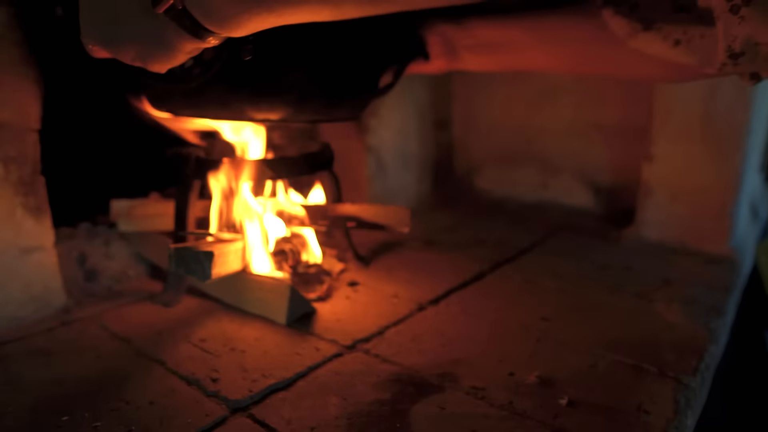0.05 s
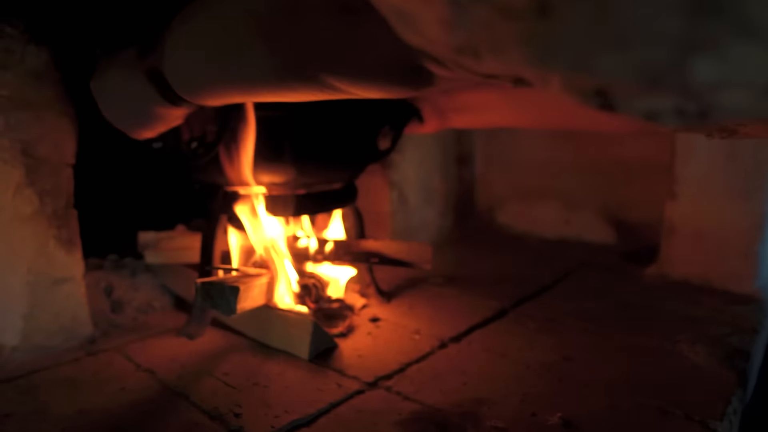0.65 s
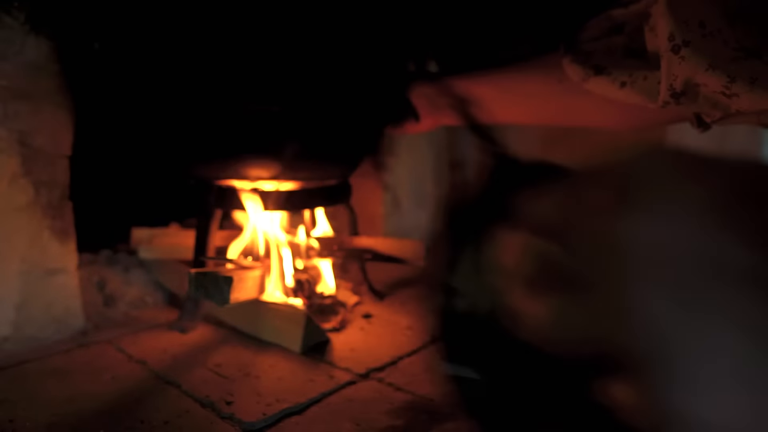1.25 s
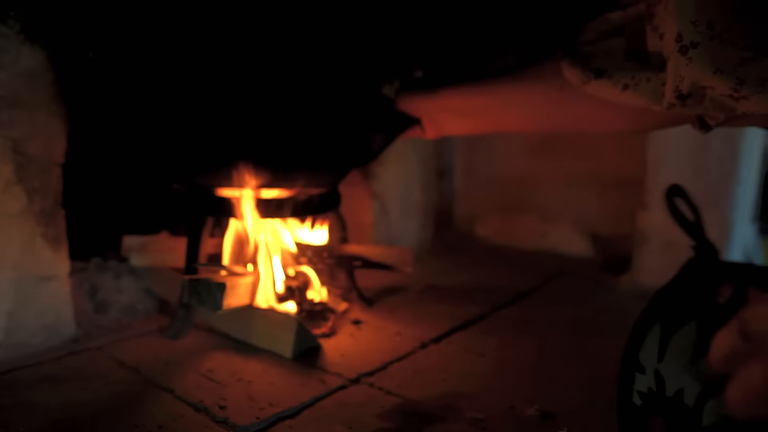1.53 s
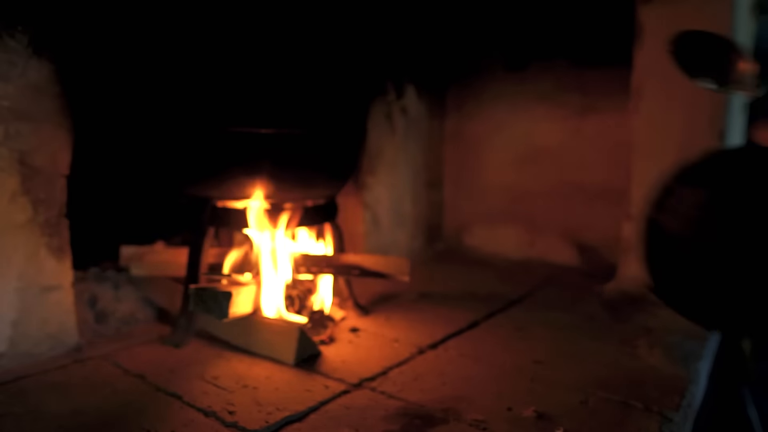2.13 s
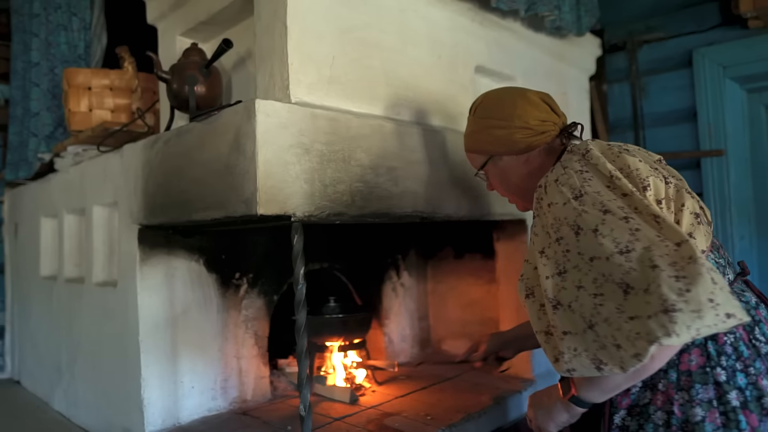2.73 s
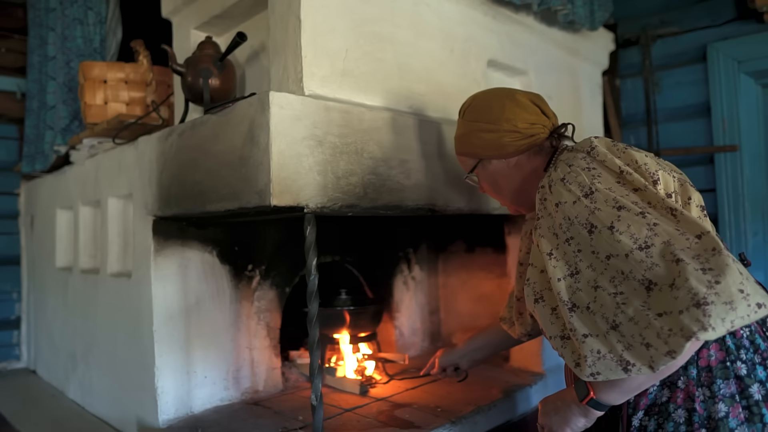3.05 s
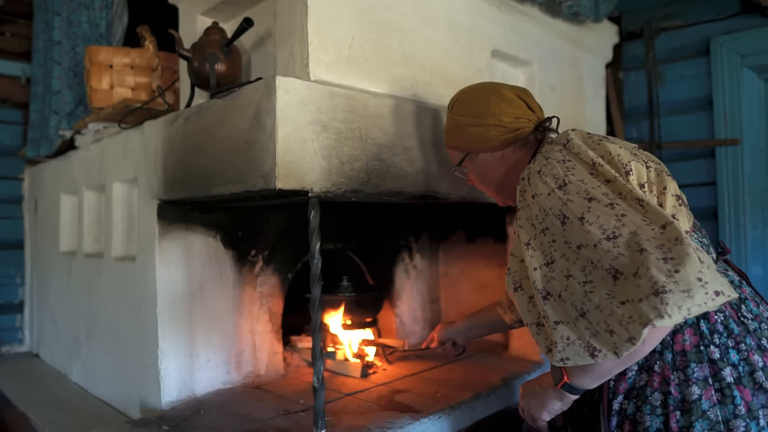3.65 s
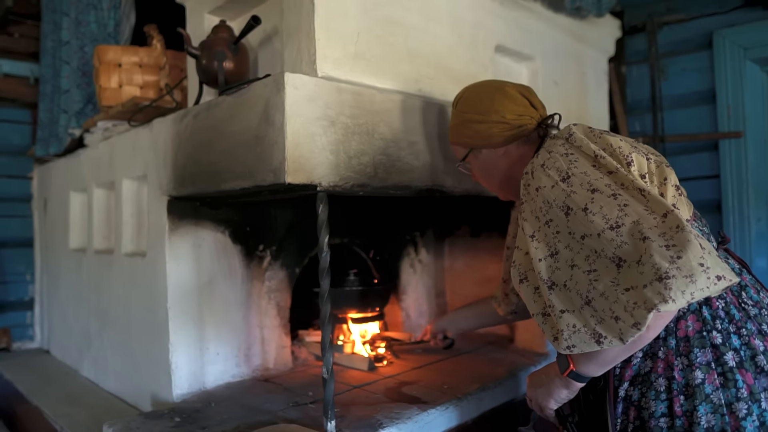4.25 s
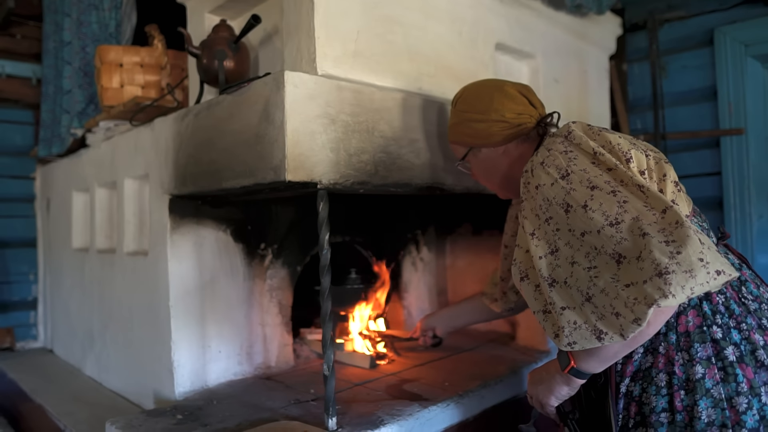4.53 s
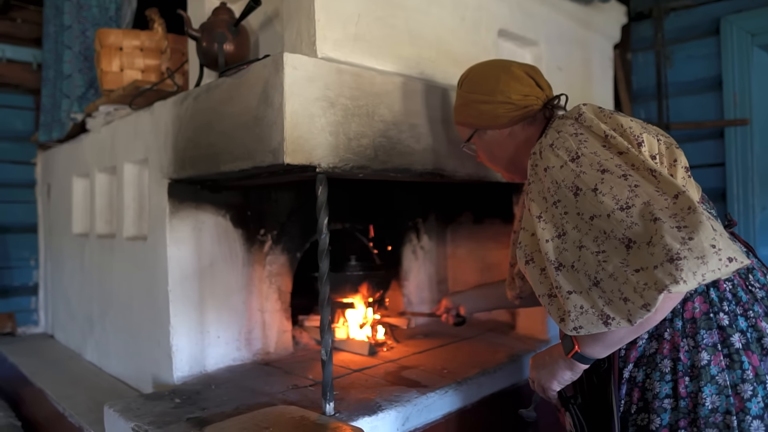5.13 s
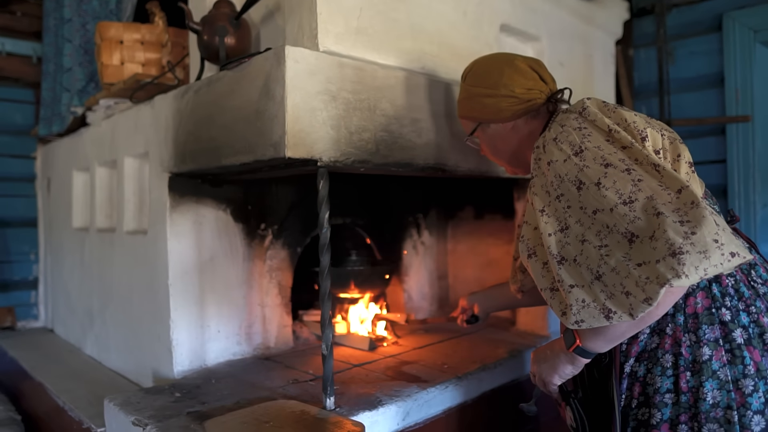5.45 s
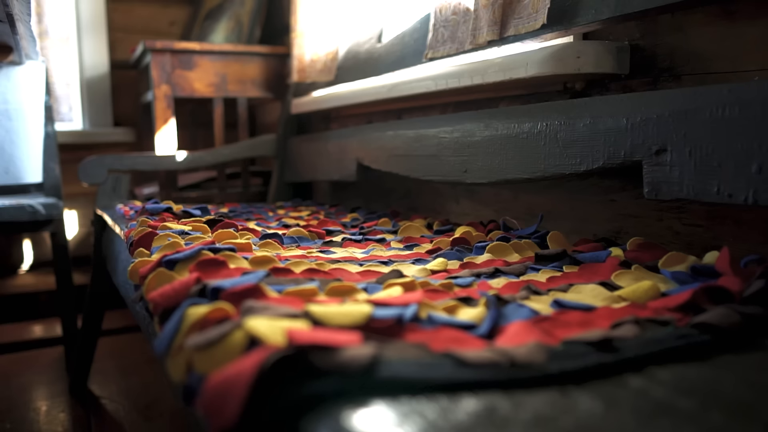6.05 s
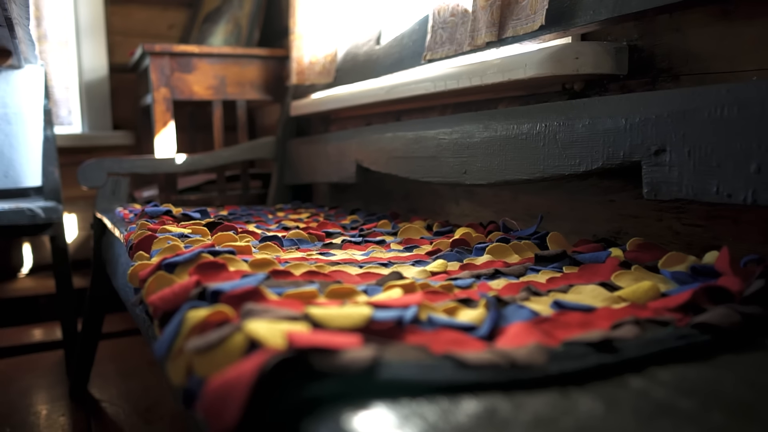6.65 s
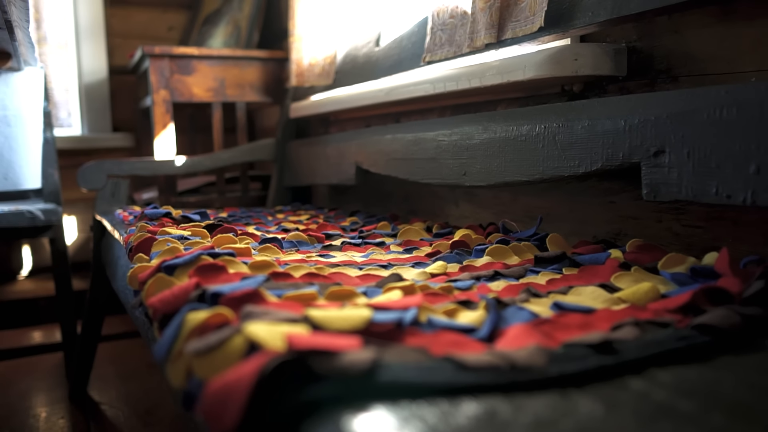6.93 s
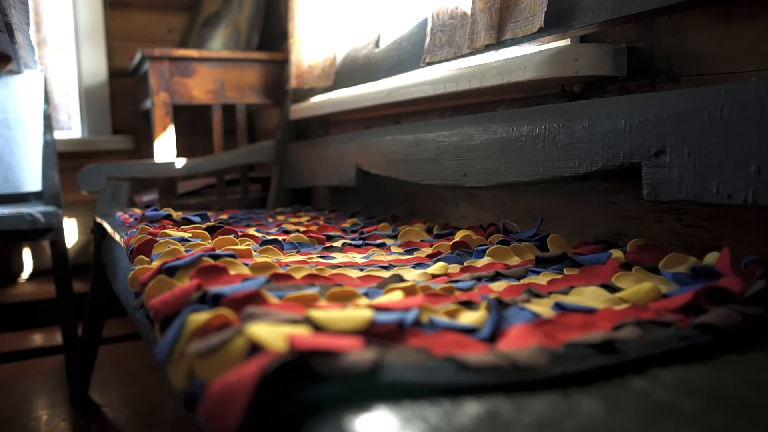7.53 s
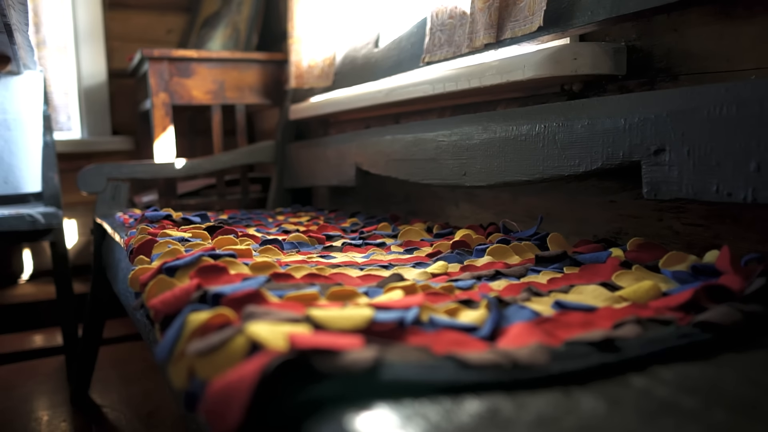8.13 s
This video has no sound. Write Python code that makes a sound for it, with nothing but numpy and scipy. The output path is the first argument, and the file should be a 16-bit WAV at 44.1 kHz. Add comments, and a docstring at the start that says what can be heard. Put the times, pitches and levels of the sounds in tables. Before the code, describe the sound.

A wood fire hisses softly and ticks close by in a quiet kitchen with a low rumble. After a small knock, a heavy iron pot lands on its trivet at about 0.6 seconds, rocking with a loud, briefly ringing clatter. Around 1 second a sleeve rubs and thumps the microphone, followed by faint, short whistles of steam from the wood. At 2 seconds a pan is put down with a loud knock that rings in the hollow brick stove, and the fire snaps sharply. From about 2.7 seconds the hiss is softer. Between 3 and 6 seconds iron and firewood scrape over the gritty hearth in several short pushes, with light clinks, clicks and knocks. At about 6 seconds the fire falls away. Soft cloth swishes come around 7 seconds and again more faintly near 8, with a few gentle low bumps.

```python
"""Cast iron at a wood stove

A sleeve brushes the microphone as a pot rocks on its trivet, its modes ringing after each impact. The
fire hisses, snaps and whistles with escaping gas; a pan knocks and excites the hollow of the brick stove.
Iron and firewood grind over the gritty hearth with knocks and clinks; cloth swishes in the quiet kitchen.
"""
import sys
import numpy as np
from scipy import signal
from scipy.fft import rfft, irfft
from scipy.io import wavfile
from scipy.ndimage import uniform_filter1d

SR = 44100
rng = np.random.default_rng(int(sys.argv[2]) if len(sys.argv) > 2 else 0)


def pcm_store(signal):
    """Save signal as 16-bit PCM."""
    levels = np.round(np.clip(np.atleast_2d(signal), -1, 1) * 32767)
    wavfile.write(sys.argv[1], SR, levels.astype(np.int16).T)


N = 370440
TIME = np.arange(N) / SR
AGE = np.arange(32768) / SR  # seconds since an impact


def amp(db):
    """Decibels as an amplitude ratio."""
    return 10 ** (np.asarray(db) / 20)


def unit(x):
    """Normalisation to rms 1."""
    return x / np.sqrt(np.mean(x ** 2))


def along(points, size):
    """Log-frequency interpolation of (Hz, value) points at the bins of a transform."""
    hz, value = np.transpose(points)
    return np.interp(np.log(np.arange(size // 2 + 1) * SR / size + 1), np.log(hz), value)


def colour(x, points):
    """Spectral shaping by (Hz, dB) points."""
    size = x.shape[-1]
    return irfft(rfft(x) * amp(along(points, size)), size)


def spread(pair, width):
    """Mid-side stereo from two uncorrelated signals."""
    size = pair.shape[-1]
    ratio = amp(along(width, size))
    mid, side = rfft(pair) / np.sqrt(1 + ratio ** 2)
    return irfft(np.array([mid + ratio * side, mid - ratio * side]), size)


def stereo_noise(width, size=len(AGE)):
    """Partly correlated white noise in two channels."""
    return spread(rng.standard_normal((2, size)), width)


def pan(db):
    """Gains for a balance: the level difference, left minus right."""
    return amp(np.array([[db], [-db]]) / 2)


def add(track, s, sound):
    """Superposition of a sound on a track at s seconds."""
    start = max(int(s * SR), 0)
    track[:, start:start + sound.shape[-1]] += sound[..., :N - start]


def flicker(rate_hz, depth_db):
    """Random amplitude modulation."""
    steps = rng.standard_normal(4096)
    return amp(depth_db * np.interp(TIME * rate_hz, np.arange(len(steps)), steps))


def grains(per_s, scatter_db):
    """Shot noise: tiny impulses of unequal size at instants shared by both channels, each with its own random
    amplitude."""
    sizes = amp(scatter_db * np.minimum(rng.exponential(size=N), 5))
    return unit(rng.standard_normal((2, N)) * sizes * (rng.random(N) < per_s / SR))


def fade(t60):
    """Exponential decay by 60 dB in t60 seconds."""
    return np.exp(-np.log(1000) * AGE / t60)


def contact(points):
    """A minimum-phase pulse, the shortest causal one with a given spectrum; peak 1."""
    size = len(AGE)
    cepstrum = irfft(np.log(amp(along(points, size))))
    causal_fold = 1 + np.sign(np.fft.fftfreq(size))
    pulse = irfft(np.exp(rfft(cepstrum * causal_fold))) * fade(.2)
    return pulse / np.abs(pulse).max()


def ring(modes, ratio=1):
    """Modal decay: each blow lands elsewhere and weights the modes anew."""
    return sum(amp(db + 2 * rng.standard_normal()) * rng.choice([-1, 1])
               * fade(t60) * np.sin(2 * np.pi * hz * ratio * AGE) for hz, db, t60 in modes)


def body_note(hz, t60):
    """A damped oscillation that builds over half a cycle; peak 1."""
    note = fade(t60) * np.sin(2 * np.pi * hz * AGE) * (1 - np.exp(-2 * hz * AGE))
    return note / np.abs(note).max()


def resonate(x, hz, width):
    """A second-order resonance, gain 1 at its centre."""
    return signal.lfilter(*signal.iirpeak(hz, hz / width, SR), x)


def stroke(rise, hold, sag_db_per_s, release_t60):
    """Friction envelope: a movement gathers speed, slackens steadily, then dies away."""
    age = TIME[:int((rise + hold + release_t60) * SR)]
    attack = np.sin(np.pi / 2 * np.minimum(age / rise, 1)) ** 2
    sag = amp(-sag_db_per_s * np.clip(age - rise, 0, hold))
    release = np.exp(-np.log(1000) * np.maximum(age - rise - hold, 0) / release_t60)
    return attack * sag * release


def stretch_of(texture, gain):
    """A random stretch of a texture, as long as its envelope."""
    start = rng.integers(N // 2)
    return texture[:, start:start + len(gain)]


# Stereo width of diffuse and of nearby sound. Each row: frequency in Hz, side minus mid in dB.
ECHO_WIDTH = [(60, 2), (200, -6), (500, -5), (1200, -2), (3000, -5.5), (8000, 2), (16000, -4)]
NEAR_WIDTH = [(500, -9), (2000, -19), (4500, -7.5), (12000, -4)]
# Reverberation of the kitchen. Each row: frequency in Hz, t60 in seconds.
KITCHEN_T60 = [(100, .42), (300, .46), (700, .45), (1400, .33), (3000, .28), (7000, .24), (16000, .2)]

def kitchen(early_db=-2, early_t60=0.027):
    """Impulse response: early reflections in the brick alcove, then a tail whose treble dies first."""
    diffuse = rfft(stereo_noise(ECHO_WIDTH))
    late = 0
    for hz, t60 in KITCHEN_T60:
        band = along([(f, f == hz) for f, _ in KITCHEN_T60], len(AGE))
        late = late + irfft(diffuse * band) * unit(fade(t60))
    early = stereo_noise(NEAR_WIDTH) * unit(fade(early_t60))
    onset = np.minimum(AGE / 0.0036, 1)
    return (late + amp(early_db) * early) * onset / np.sqrt(len(AGE) * (1 + amp(2 * early_db)))


def convolve(x, response):
    """Convolution: how a room or a ringing body answers an excitation."""
    return signal.fftconvolve(np.atleast_2d(x), response, axes=1)[:, :x.shape[-1]]


# The background steps down at 2.68 s and again at 6.09 s. Each row: start in seconds, rumble level in dB, hiss
# level in dB.
BACKGROUND_STEPS = [(0, -52.5, -55.5), (2.68, -54.5, -62.5), (6.09, -58, -67)]
# Spectra of the room's rumble and the fire's hiss. Each row: frequency in Hz, level in dB.
RUMBLE_SPECTRUM = [(20, -7.5), (45, 1), (90, -1.5), (140, 2.5), (280, -6.5), (450, -14), (800, -27),
                   (2000, -35)]
HISS_SPECTRUM = [(290, -39), (500, -9.5), (708, -1.5), (1280, -6), (1510, -8), (1670, -6.5), (1820, -6.5),
                 (5800, -12), (7310, -10.5), (10400, -14), (13100, -10), (16000, -18)]
# Their stereo width. Each row: frequency in Hz, side minus mid in dB.
AIR_WIDTH = [(40, 3), (140, 10), (280, 4.5), (560, -6), (1500, -5), (4500, -4.5), (12000, -1)]
# Low room modes, and steam in narrow cracks. Each row: centre in Hz, bandwidth in Hz, level in dB.
ROOM_MODES = [(134.1, 22, -66.5), (259.7, 87, -68.5)]
SIZZLE_BANDS = [(7700, 900, -16.5), (13400, 1100, -12.5)]

def background():
    """Filtered noise: the room rumbles and its modes hum under the restless hiss of the fire."""
    starts, rumble_db, hiss_db = np.transpose(BACKGROUND_STEPS)
    step = np.searchsorted(starts[1:], TIME)
    rumble = unit(colour(stereo_noise(AIR_WIDTH, N), RUMBLE_SPECTRUM))
    hum = sum(amp(db) * unit(resonate(resonate(rng.standard_normal(N), hz, width), hz, width))
              for hz, width, db in ROOM_MODES)
    hiss = unit(colour(spread(grains(41000, 1.5), AIR_WIDTH), HISS_SPECTRUM))
    sizzle = sum(amp(db) * unit(resonate(rng.standard_normal(N), hz, width))
                 for hz, width, db in SIZZLE_BANDS)
    room = rumble * flicker(16, 0.91) * amp(rumble_db)[step] + hum
    fire = (hiss + (TIME < starts[-1]) * sizzle) * flicker(25, 0.85) * amp(hiss_db)[step]
    return pan(-2.2) * room + pan(-1.2) * fire


# Light touches of iron. Each row: start in seconds, relative level in dB, pitch ratio.
CLINKS = [(0.036, -37.5, .97), (0.049, -38, 1), (1.984, -47, 1), (3.441, -47.5, 0.94), (3.476, -37, 0.73),
          (3.491, -42.5, .92), (3.877, -35, 0.69), (4.549, -60, 0.68)]
# Modes of the thin iron. Each row: frequency in Hz, level in dB, t60 in seconds.
CLINK_MODES = [(2300, -11.5, 0.03), (2590, -5, 0.057), (2690, -13, .04), (2990, -5.5, .045),
               (3695, 1.5, 0.07), (3863, 6, 0.034), (4160, -12, 0.035), (4360, 3, 0.061),
               (4540, -14.5, .04), (5430, -16, .04), (8460, -16, .04)]

def clinks():
    """Forced vibration: thin iron parts graze, and the chatter of contacts drives their high modes."""
    out = np.zeros((2, N))
    for s, db, ratio in CLINKS:
        chatter = rng.standard_normal(len(AGE)) * fade(0.049)
        chatter = chatter / np.linalg.norm(chatter)
        grit = colour(chatter, [(700, -19.5), (1800, -8), (4200, 3.5), (7000, -23), (16000, -36)])
        ringing = convolve(chatter, ring(CLINK_MODES, ratio)[None])
        add(out, s, amp(db) * (ringing + amp(35.5) * grit))
    return amp(-8) * out + amp(-5) * convolve(out, kitchen())


# Sleeve strokes. Each row: start, rise and hold in seconds, sag in dB per second, level in dB.
SLEEVE_STROKES = [(0.069, 0.036, 0.69, 5.5, -45), (0.92, 0.009, 0.054, 33, -16.5),
                  (1.017, 0.031, 0.045, 47, -9)]
# Spectrum of the rubbing. Each row: frequency in Hz, level in dB.
SLEEVE_SPECTRUM = [(20, -8), (60, -5.5), (140, -5.5), (300, -16.5), (600, -24.5), (1200, -39), (2500, -50),
                   (8000, -48), (16000, -63.5)]
SLIP_START_S, SLIP_LENGTH_S, SLIP_HZ = 1.029, 0.033, 179

def sleeve():
    """Stick-slip friction: a sleeve rubs the microphone and briefly judders, unevenly at each port."""
    out = np.zeros((2, N))
    slip = contact([(20, -14.5), (90, 8), (250, 6.5), (550, -7), (1100, -16), (2300, -27.5),
                    (4500, -38.5), (9000, -53), (16000, -53)])
    ports = np.diag([-amp(-4.5), 1])  # the left is weaker and inverted
    for age in np.arange(0, SLIP_LENGTH_S, 1 / SLIP_HZ):
        force = np.sin(np.pi * age / SLIP_LENGTH_S) ** 2
        for port, jitter_s in zip(ports, 0.00066 * rng.standard_normal(2)):
            add(out, SLIP_START_S + age + jitter_s, amp(25.5) * force * np.outer(port, slip))
    rub = unit(colour(stereo_noise([(50, 2), (1000, -2)], N), SLEEVE_SPECTRUM))
    for s, rise, hold, sag, db in SLEEVE_STROKES:
        gain = stroke(rise, hold, sag, release_t60=0.18)
        add(out, s, amp(db) * pan(-10) * gain * stretch_of(rub, gain))
    return out


# The loudest snaps of the fire. Each row: start in seconds, relative level in dB.
SNAPS = [(0.099, -31), (0.171, -37), (1.564, -30), (2.112, -12.5), (2.314, -28.5), (2.3562, -23.5),
         (2.7462, -34.5), (3.0776, -42), (5.2192, -38), (5.273, -28)]
# Spectrum of a snap. Each row: frequency in Hz, level in dB.
SNAP_SPECTRUM = [(300, -29.5), (1500, -3.5), (3500, -5), (6000, -3.5), (9000, -1.5), (16000, -6.5)]
TICKS_PER_S, TICK_DB, TICK_SCATTER_DB = 2.8, -47.5, 3

def fire_snaps():
    """Sudden pressure release: gas pockets burst in the wood, as loud snaps among Poisson-timed ticks."""
    out, last_step_s = np.zeros((2, N)), BACKGROUND_STEPS[-1][0]
    gap_draws, level_draws = rng.random((64, 2)).T
    times = np.cumsum(-np.log(gap_draws)) / TICKS_PER_S
    levels = TICK_DB + TICK_SCATTER_DB * (2 * level_draws - 1)
    ticks = [(s, db) for s, db in zip(times, levels) if s < last_step_s]
    crack = contact(SNAP_SPECTRUM)
    for s, db in SNAPS + ticks:
        burst = unit(colour(stereo_noise(NEAR_WIDTH), SNAP_SPECTRUM)) * fade(0.0091)
        add(out, s, amp(db) * (amp(-9) * crack + amp(-7.5) * burst))
    return out + amp(-3) * convolve(out, kitchen(early_db=1.5))


# Soft bumps at the microphone, and the low ringing body of a knock at 4.74 s.
# Each row: start in seconds, level in dB, frequency in Hz, t60 in seconds, balance in dB.
THUDS = [(0.118, -24, 93, 0.054, -14), (0.456, -32.5, 158, .15, -11), (.925, 0.5, 75.2, 0.044, -18),
         (0.964, 1.5, 54, 0.12, -10), (1.034, 24, 69.4, 0.046, 7), (1.0682, 26.5, 294, 0.006, -17),
         (3.089, -19.5, 106, 0.075, -5), (3.097, -30.5, 265, 0.12, 6), (4.74, -44, 186, 0.7, 5),
         (6.215, -35, 67.5, 0.13, -3), (6.53, -41.5, 89.5, .08, -7), (8.052, -28.5, 117.7, 0.064, -4),
         (8.06, -30.5, 273, 0.061, 3)]

def thuds():
    """Damped low oscillations, out of phase at the two microphone ports."""
    out, port_phase = np.zeros((2, N)), np.array([[2.1], [0]])
    for s, db, hz, t60, pan_db in THUDS:
        envelope = fade(t60) * (1 - np.exp(-2 * hz * AGE))
        add(out, s, amp(db) * pan(pan_db) * envelope * np.sin(2 * np.pi * hz * AGE + port_phase))
    return out


# Firewood and iron strike brick. Each row: start in seconds, level in dB, body frequency in Hz, its t60
# in seconds, crack in dB re the body, room in dB re the blow, balance in dB.
KNOCKS = [(.281, -20, 770, 0.0028, -11, 12.5, -6.5), (0.282, -10.5, 314, 0.035, -33, -4, -8),
          (1.297, -40.5, 810, 0.0069, -14.5, 7.5, 3.5), (1.744, -53.5, 900, 0.0033, 16.5, 13, -9),
          (3.1058, -27, 1320, 0.0046, 7.5, 0, -3), (3.457, -44.5, 390, 0.0063, -8, 15, -2),
          (4.7, -28.5, 500, 0.038, -10, -6, -1), (4.7137, -30, 910, 0.0035, 6, 0.5, -2),
          (4.728, -27.5, 316, 0.0086, 5, 0, 1), (5.493, -46.5, 1020, 0.014, 8, 9, -2),
          (5.836, -38, 354, 0.014, -25, 6.5, -1.5), (5.842, -42, 574, 0.019, -3, 6, -4),
          (8.051, -55.5, 1120, 0.011, -13.5, 8, 0)]

def knocks():
    """Heavily damped impact: a body note under a short crack, with a dull thock of the brick."""
    out, room = np.zeros((2, N)), kitchen(early_db=1, early_t60=0.084)
    crack = contact([(100, -16.5), (1200, 3), (2000, 1.5), (4000, -10), (16000, -18.5)])
    thock = contact([(80, -10.5), (250, 1.5), (850, 1), (1700, -8.5), (2600, -20), (9000, -45.5)])
    for s, db, hz, t60, crack_db, room_db, pan_db in KNOCKS:
        blow = amp(1) * body_note(hz, t60) + amp(crack_db) * crack + thock
        reverb = amp(room_db) * convolve(blow, room)
        add(out, s, amp(db) * (pan(pan_db) * blow + pan(pan_db / 2) * reverb))
    return out


# The pot meets the trivet. Each row: start in seconds, level in dB, ring gain in dB, room gain in dB.
POT_BLOWS = [(0.5895, 17, -1, -6.5), (0.599, -11, -17.5, -5.5), (0.6147, 2, 12, 3.5),
             (.619, -7.5, 10.5, 1.5), (0.6368, -0.5, 11.5, -3), (0.648, -4, 8, -16.5),
             (0.708, -17, 17.5, 4.5), (0.711, -12.5, -13, -7.5)]
# Spectrum of the contact. Each row: frequency in Hz, level in dB.
POT_SPECTRUM = [(40, -20.5), (130, -9.5), (300, 4.5), (650, 0), (1200, -3.5), (1750, -12), (2200, -13.5),
                (4500, -22.5), (8000, -37), (16000, -62.5)]
# Modes of the pot. Each row: frequency in Hz, level in dB, t60 in seconds.
POT_MODES = [(163, -33, 0.39), (187.9, -28, 0.32), (330, -26.5, 0.13), (375, -29, .12), (434.8, -21, 0.07),
             (508, -33.5, 0.23), (875, -40, .15), (903, -32.5, 0.13), (1215, -28, 0.12), (1490, -36, .1),
             (1750, -36.5, .1), (1900, -41, .1), (2342, -34.5, 0.16), (2860, -35.5, .1), (2880, -42, 0.13),
             (3295, -50, 0.17), (3780, -45, 0.16), (5000, -51, 0.15)]

def pot():
    """Impulse excitation: the heavy pot lands and rocks, and each blow rings its modes briefly."""
    out, alcove = np.zeros((2, N)), kitchen(early_db=9.5, early_t60=0.11)
    # the contact builds over about a millisecond and kicks the iron wall through a few swings
    clack = np.sin(2 * np.pi * 1400 * AGE) * np.exp(-((AGE - .0009) / 0.00058) ** 2)
    blow = amp(-5) * contact(POT_SPECTRUM) + amp(-3.5) * clack + amp(-14) * body_note(hz=320, t60=.01)
    clatter = amp(3) * contact([(60, -20), (200, 2.5), (450, 6), (700, 0.5), (1300, -2.5), (2500, -6),
                                (4000, -17.5), (8000, -34.5), (16000, -48.5)])
    reverb = convolve(clatter, alcove)
    rattle = colour(rng.standard_normal((2, len(AGE))),
                    [(1500, -20), (2700, -9), (5000, -5.5), (8000, -13), (16000, -33.5)]) * fade(.07)
    for s, db, ring_db, room_db in POT_BLOWS:
        ringing = ring(POT_MODES) + amp(-30) * rattle
        add(out, s, amp(db) * (blow + amp(ring_db) * ringing + amp(room_db) * reverb))
    return out


# Damp wood sings. Each row: start and length in seconds, first and last pitch in Hz, relative level in dB.
WHISTLES = [(1.098, 0.069, 1616, 1143, -39), (1.278, 0.121, 1318, 1490, -51.5),
            (2.376, 0.88, 1510, 1504, -67.5), (3.25, 0.586, 1580, 1527, -64)]

def steam_whistles():
    """Flow tones: steam escaping the firewood swells, glides and fades, roughened by noise modulation."""
    lowpass = signal.butter(2, 100, fs=SR, output="sos")
    roughness = unit(signal.sosfilt(lowpass, rng.standard_normal(N)))
    tone = np.zeros((1, N))
    for s, length, first_hz, last_hz, db in WHISTLES:
        progress = TIME[:int(length * SR)] / length
        hz = first_hz + (last_hz - first_hz) * progress
        add(tone, s, amp(db) * np.sin(np.pi * progress) * np.sin(2 * np.pi * np.cumsum(hz) / SR))
    tone = tone * roughness
    return amp(-1.5) * tone + amp(-5) * convolve(tone, kitchen())


# Cloth slides. Each row: start, rise and hold in seconds, sag in dB per second,
# rustle gain in dB, body gain in dB.
SWISHES = [(1.383, 0.12, 0.041, 91, -66.5, -53.5), (6.72, 0.26, 0.021, 30, -54, -68.5),
           (6.955, 0.085, 0.057, 57, -44, -56), (7.079, 0.12, 0.11, 92, -45, -45),
           (7.475, .06, 0.15, 65.5, -56.5, -63), (8.1, 0.089, .02, 82, -58.5, -61)]
# Folds flick. Each row: start in seconds, level in dB.
FLICKS = [(6.824, -52), (6.915, -50), (7.81, -65), (7.901, -58.5), (8.166, -48.5)]
# Spectra of the rustle and its body. Each row: frequency in Hz, level in dB.
RUSTLE_SPECTRUM = [(1180, -20), (2000, -6), (2880, -8), (3460, -2.5), (4860, -1.5), (5440, -2), (7510, 1.5),
                   (15100, 0), (16000, -15)]
CLOTH_BODY_SPECTRUM = [(300, -15), (650, -1), (1200, -3), (2300, -1.5), (4000, -1), (8000, -9)]
# Their stereo width. Each row: frequency in Hz, side minus mid in dB.
CLOTH_WIDTH = [(600, -1.5), (2500, -4.5), (8000, 2.5), (14000, 2.5)]

def cloth():
    """Friction noise: countless fibres slip past each other; pressure adds body, and folds flick."""
    rustle = amp(2.5) * unit(colour(spread(grains(20000, 1.4), CLOTH_WIDTH), RUSTLE_SPECTRUM))
    body = amp(1) * pan(-2.9) * unit(colour(spread(grains(12000, 1.3), CLOTH_WIDTH), CLOTH_BODY_SPECTRUM))
    out, flick = np.zeros((2, N)), fade(0.2)
    for s, rise, hold, sag, rustle_db, body_db in SWISHES:
        gain = stroke(rise, hold, sag, release_t60=0.28)
        fibres = amp(rustle_db) * stretch_of(rustle, gain) + amp(body_db) * stretch_of(body, gain)
        add(out, s, gain * fibres)
    for s, db in FLICKS:
        add(out, s, amp(db) * flick * unit(stretch_of(rustle, flick)))
    return out * flicker(34, 1)


# The pan is put down. Each row: start in seconds, level in dB, balance in dB.
PAN_HITS = [(2.0279, 18.5, -5.5)]
# Modes of the pan. Each row: frequency in Hz, level in dB, t60 in seconds.
PAN_MODES = [(260, -46, 1), (620, -52, 1), (580, -41, 0.21), (652, -41.5, 0.78), (700, -19.5, 0.18),
             (757, -54, 1), (846, -40.5, 0.66), (1156, -16, 0.13), (1980, -24.5, 0.26), (2490, -57, 0.25),
             (3640, -33.5, 0.22), (4600, -41, .18)]
# Spectra of the contact and of the stove's hollow. Each row: frequency in Hz, level in dB.
PAN_SPECTRUM = [(40, -13), (140, 0), (280, 3), (450, -0.5), (700, 2), (1150, 0), (1550, -3.5), (2500, -4),
                (4000, -11), (7300, -13.5), (10000, -21.5), (16000, -43)]
HOLLOW_SPECTRUM = [(100, -17.5), (280, 1.5), (420, -6.5), (660, 0), (900, -10), (1300, -17.5),
                   (3000, -48.5)]

def pan_knock():
    """Impact and cavity resonance: the pan hits a ledge on the right; it, the stove and the room ring."""
    out, room = np.zeros((2, N)), kitchen(early_db=4.5, early_t60=.03)
    hollow = unit(colour(stereo_noise(ECHO_WIDTH), HOLLOW_SPECTRUM)) * fade(t60=0.74)
    blow = contact(PAN_SPECTRUM)
    clack = amp(-12.5) * body_note(hz=900, t60=0.003)
    for s, db, pan_db in PAN_HITS:
        tail = amp(-7.5) * ring(PAN_MODES) + amp(-39) * hollow + amp(4) * convolve(blow, room)
        add(out, s, amp(db) * (pan(pan_db) * (blow + clack) + pan(-3.5) * tail))
    return out


# Pushes over the hearth, and a faint rough whine at 5.32 s.
# Each row: start, rise and hold in seconds, sag in dB per second, grinding gain in dB,
# sand gain in dB, pitch ratio of the modes, their level in dB re the grit.
DRAGS_AND_WHINE = [(3.247, 0.038, 0.035, 16, -59.5, -67, 1, -12),
                   (3.375, 0.1, 0.046, 193, -47.5, -47, 1.5, -15),
                   (3.812, 0.06, 0.45, 33, -43.5, -41.5, 0.94, -8),
                   (4.305, 0.045, 0.057, 50, -58, -53, .9, -12),
                   (4.474, 0.026, 0.27, 9, -55, -50, 0.7, -11),
                   (4.818, 0.077, 0.12, 85.5, -60, -49.5, .85, -5),
                   (5.318, 0.028, 0.11, 15, -63.5, -78, .95, 0),
                   (5.466, 0.12, 0.12, 65, -54.5, -49.5, .92, -15),
                   (5.719, 0.072, 0.13, 88, -53, -47.5, 0.56, -4)]
# Spectra of coarse grit and fine sand. Each row: frequency in Hz, level in dB.
GRIT_SPECTRUM = [(200, -45), (450, -3), (700, -13), (1000, -1.5), (1700, -5.5), (2400, -4), (3300, 0),
                 (5400, -11), (8000, -7), (16000, -54)]
SAND_SPECTRUM = [(2500, -2.5), (5000, -4), (7500, 2.5), (10000, -3.5), (13000, -0.5), (16000, -13)]
# Modes of the dragged load. Each row: centre in Hz, bandwidth in Hz, gain in dB.
LOAD_MODES = [(1765, 110, 16), (3070, 29, -3), (3630, 54, -18), (4290, 44, 17), (4400, 64, 13),
              (5120, 22, -31), (5640, 40, -34)]
# The largest grains catch. Each row: start in seconds, level in dB.
CATCHES = [(3.479, -34), (3.8234, -32), (3.856, -28), (3.877, -31), (3.9661, -24.5), (3.985, -20),
           (4.067, -21), (4.1103, -23.5), (4.553, -26.5), (4.6832, -25.5), (5.7443, -42), (5.778, -28)]

def drags_and_whine():
    """Granular friction: grit rings the load, sand hisses, large grains snap; a faint whine joins in."""
    coarse = unit(colour(spread(grains(2200, 2.4), NEAR_WIDTH), GRIT_SPECTRUM))
    fine = unit(colour(spread(grains(7000, 2.4), NEAR_WIDTH), SAND_SPECTRUM))
    out = np.zeros((2, N))
    for s, rise, hold, sag, grind_db, sand_db, ratio, ring_db in DRAGS_AND_WHINE:
        gain = stroke(rise, hold, sag, release_t60=0.24)
        grit = stretch_of(coarse, gain)
        ringing = unit(sum(amp(db) * resonate(grit, hz * ratio, width) for hz, width, db in LOAD_MODES))
        grinding = unit(grit + amp(ring_db) * ringing)
        add(out, s, gain * (amp(grind_db) * grinding + amp(sand_db) * stretch_of(fine, gain)))
    out = amp(-1.03) * out * flicker(50, 1.8)
    for s, db in CATCHES:
        burst = colour(stereo_noise(NEAR_WIDTH), SNAP_SPECTRUM)
        add(out, s, amp(db) * burst / np.abs(burst).max() * fade(0.091))
    return pan(-0.79) * (out + amp(-9) * convolve(out, kitchen()))


def scene():
    """Superposition of impacts, fire, friction and background."""
    impacts = pot() + pan_knock() + knocks() + clinks() + thuds()
    fire = fire_snaps() + steam_whistles()
    return impacts + fire + drags_and_whine() + cloth() + sleeve() + background()


def gain_control(x, threshold_db=-35.5, share=0.49, recovery_db_per_s=30, window_s=0.011):
    """Compression: the gain drops for a loud blow and creeps back, so the fire sinks and swells again."""
    power = uniform_filter1d(np.mean(x ** 2, axis=0), int(window_s * SR))
    excess_db = np.maximum(10 * np.log10(np.maximum(power, 1e-12)) - threshold_db, 0)
    recovered_db = recovery_db_per_s * TIME
    cut_db = np.maximum.accumulate(share * excess_db + recovered_db) - recovered_db
    return x * amp(-uniform_filter1d(cut_db, size=128))


def record(dry):
    """Automatic gain control, hard limiting at full scale, then a steep low-pass at 16.1 kHz."""
    lowpass = signal.ellip(10, .2, 70, 16100, fs=SR, output="sos")
    return signal.sosfilt(lowpass, np.clip(gain_control(dry), -1, 1))


dry = scene()
out = record(dry)
pcm_store(out)
```